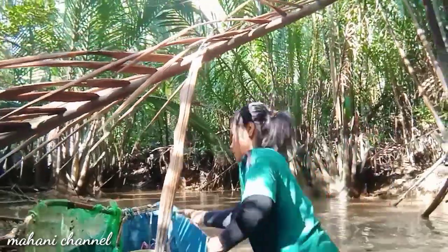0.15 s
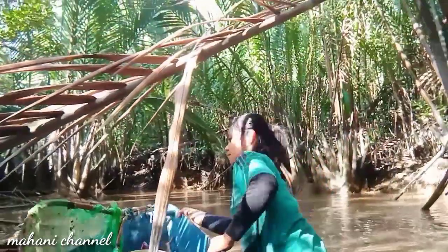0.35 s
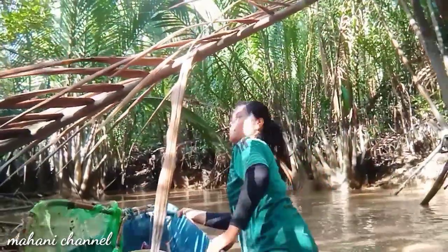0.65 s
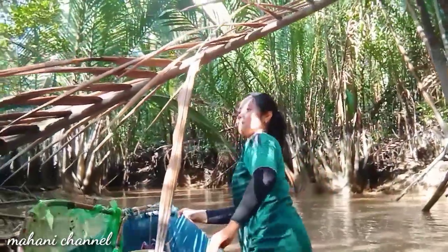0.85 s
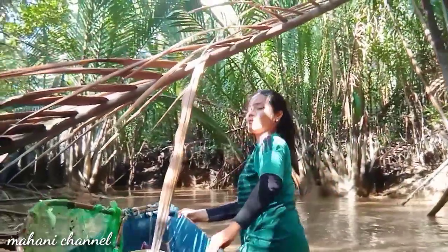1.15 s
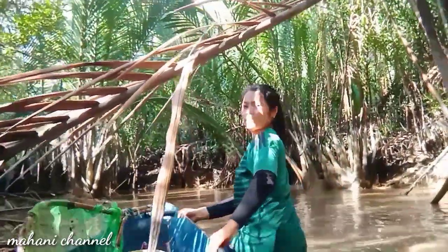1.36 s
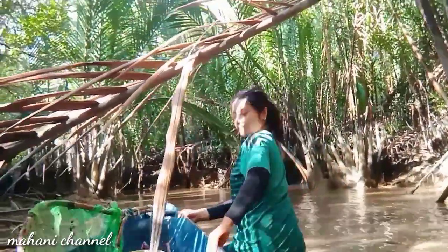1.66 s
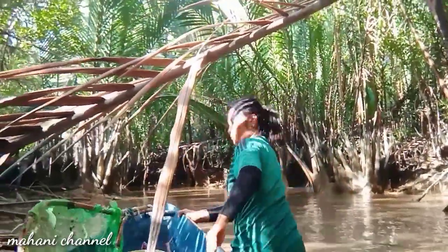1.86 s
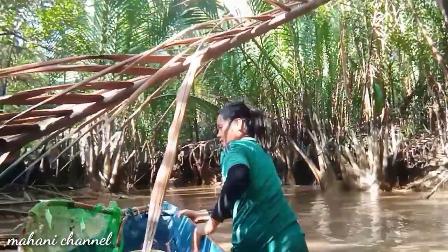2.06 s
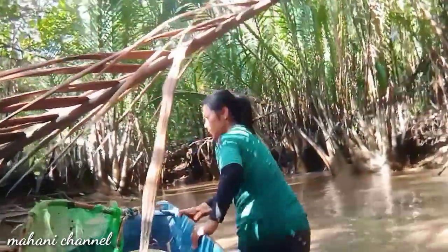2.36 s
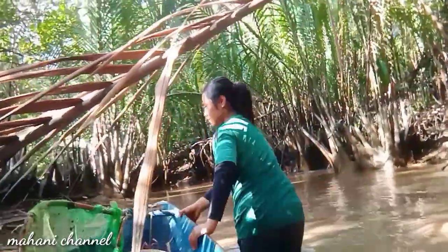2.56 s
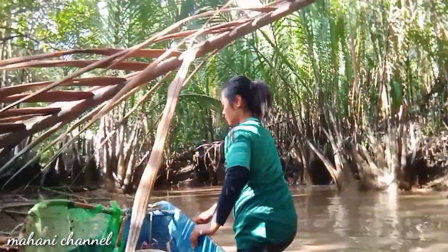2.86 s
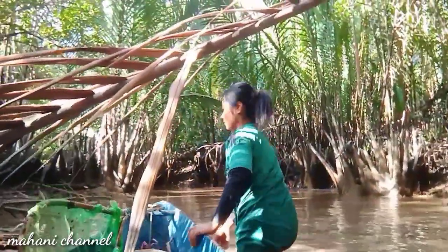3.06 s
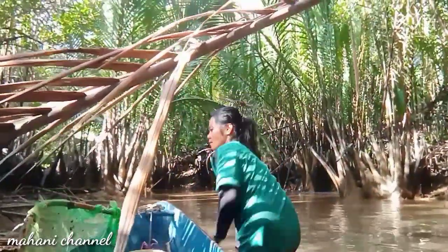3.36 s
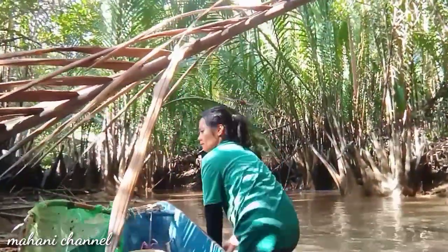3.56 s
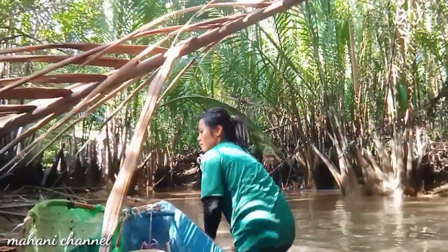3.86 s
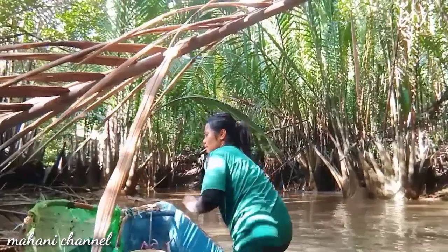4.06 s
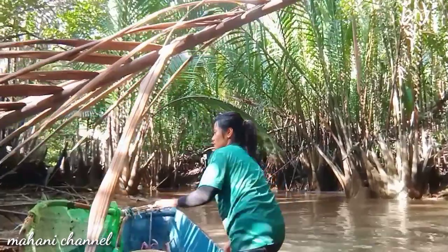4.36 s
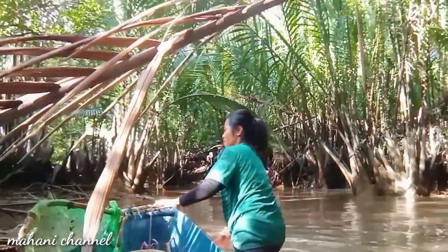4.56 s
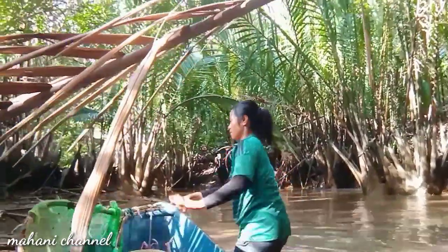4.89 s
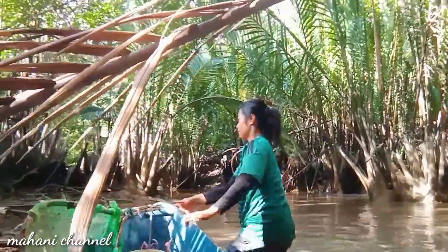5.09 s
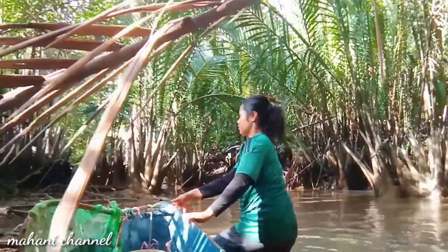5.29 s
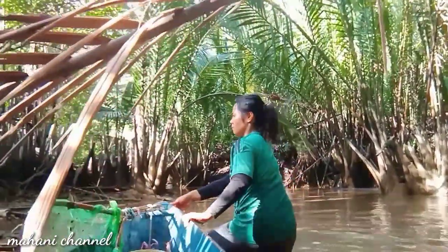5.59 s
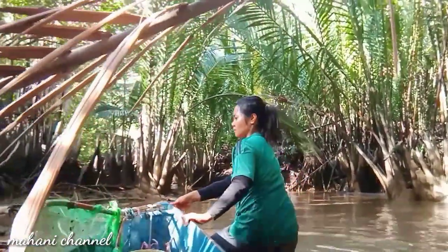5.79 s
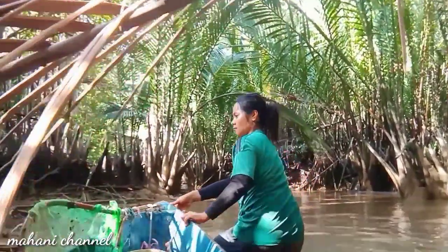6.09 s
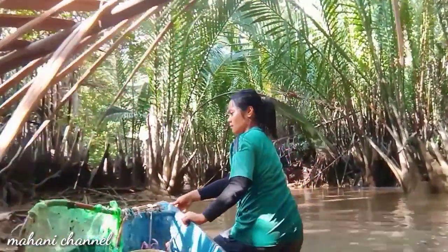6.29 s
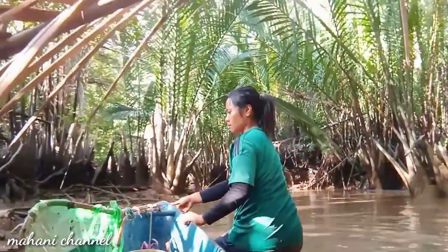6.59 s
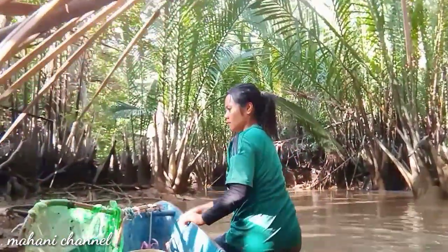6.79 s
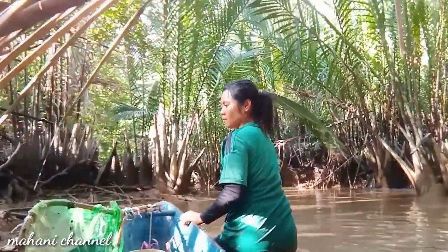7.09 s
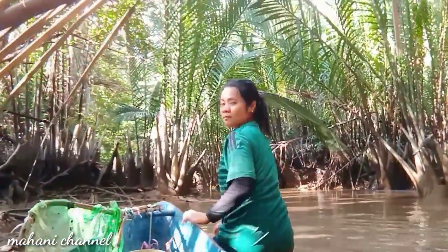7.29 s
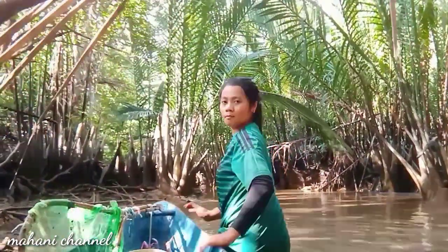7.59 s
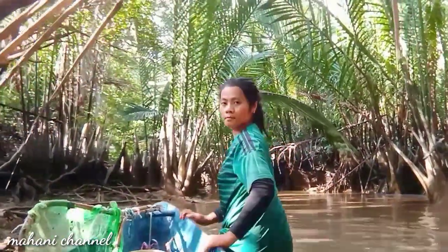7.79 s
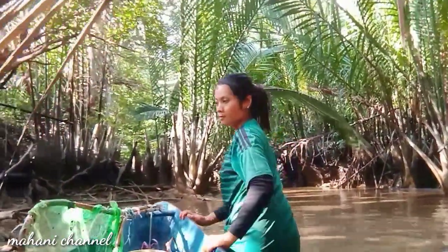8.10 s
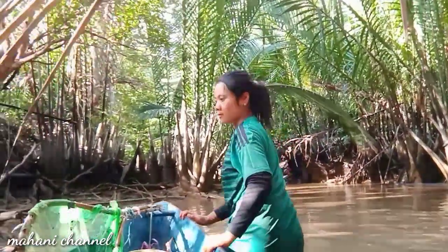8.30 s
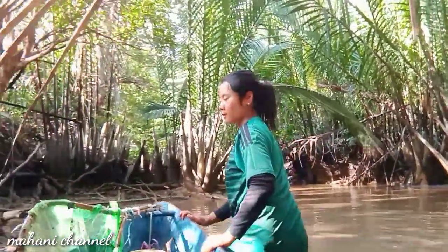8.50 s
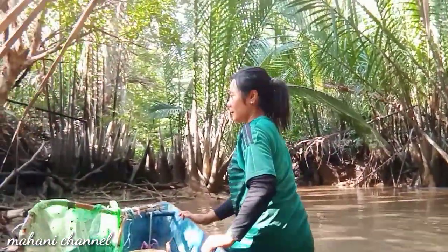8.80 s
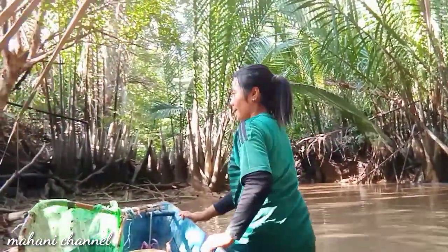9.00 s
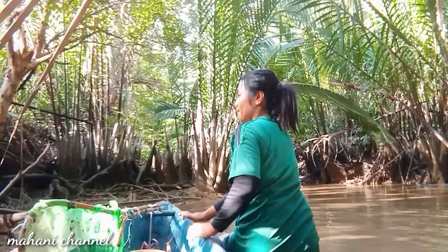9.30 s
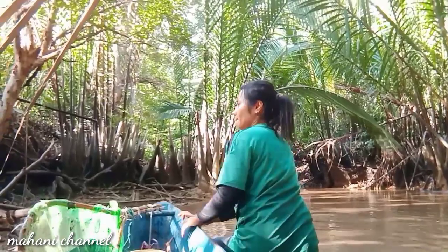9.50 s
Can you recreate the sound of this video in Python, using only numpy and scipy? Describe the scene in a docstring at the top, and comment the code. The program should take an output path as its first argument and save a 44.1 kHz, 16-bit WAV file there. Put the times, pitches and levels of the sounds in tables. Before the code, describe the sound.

Bright pulsing insect chorus dominates throughout; beneath it, muddy water sloshes and drips, dry fronds brush, and a tub thuds softly, with one stronger splash near the end.

```python
"""From the start a cicada chirps about seven times a second in a palm swamp, and neighbours answer it.
Still air and a far, wavering motor lie under it all. Drips ring early on, and someone begins to wade
in the creek: water sloshes, dry fronds brush and air gulps. After two seconds stalks snap and a plastic
tub is bumped. Thin bird whistles come in past the middle; the strongest splash follows near eight seconds.
Noise, ringing bubbles, decaying tones and rows of clicks make these sounds."""
import sys
import numpy as np
from scipy import signal
from scipy.fft import rfft, irfft, next_fast_len
from scipy.io import wavfile

SR = 44100
rng = np.random.default_rng(int(sys.argv[2]) if len(sys.argv) > 2 else 0)


def dump_mix(stems):
    """Bounce the given channels to the path in sys.argv[1] as a 16-bit WAV at rate SR."""
    frames = np.atleast_2d(stems).T  # one column per channel
    limited = np.clip(frames, -1, 1)  # hard clip at full scale
    pcm = np.round(limited * 32767).astype(np.int16)
    wavfile.write(sys.argv[1], SR, pcm)


N = 425565
T = np.arange(N) / SR  # time of every sample, s


def undb(db):
    """Turn decibels into a gain."""
    return 10 ** (np.asarray(db) / 20)


def unit(x):
    """Scale a sound to an rms of 1."""
    return x / np.sqrt(np.mean(x ** 2))


def curve(rows):
    """Draw a gain over time through (start_s, level_db) rows."""
    return undb(np.interp(T, *np.transpose(rows)))


def wander(seconds):
    """Smooth noise over the given time into a slow random drift of rms 1."""
    window = np.hanning(int(seconds * SR))
    return unit(signal.fftconvolve(rng.standard_normal(N), window, "same"))


def add(out, start_s, x):
    """Mix x into out from the given time."""
    i = int(start_s * SR)
    if 0 <= i < N:
        out[i:i + len(x)] += x[:N - i]


def ring(x, response):
    """Let every moment of x set off the same response."""
    return signal.fftconvolve(x, response)[:N]


def colour(x, points):
    """Make some pitches louder or softer, following (pitch_hz, level_db) points."""
    hz, db = np.transpose(points)
    size = next_fast_len(N, True)
    f = np.maximum(np.fft.rfftfreq(size, 1 / SR), 1)
    gain = undb(np.interp(np.log(f), np.log(hz), db))
    return irfft(rfft(x, size) * gain, size)[:N]


def thicket(t60, gap, count=400):
    """Scatter fading echoes, as off many stems, after a gap; their total energy is 1."""
    t = rng.uniform(0, t60, count)
    places = np.clip((t + gap) * SR, 0, SR - 1).astype(int)
    response = np.zeros(SR)
    np.add.at(response, places, rng.standard_normal(count) * 1000 ** (-t / t60))
    return response / np.linalg.norm(response)


def swaying(x, t60, gap, count=3):
    """Echo off moving fronds: the sound drifts between several sets of paths."""
    weights = np.array([wander(0.64) for _ in range(count)])
    weights /= np.linalg.norm(weights, axis=0)
    return sum(w * ring(x, thicket(t60, gap)) for w in weights)


def bubble(hz, cycles, glide):
    """A pocket of air rings, wobbles and glides (octaves per s), fading by 60 dB in some cycles."""
    t60 = cycles / hz
    t = np.arange(int(t60 * SR)) / SR
    knots = np.linspace(0, t60, 24)
    wobble, swell = (np.interp(t, knots, row) for row in rng.standard_normal((2, len(knots))))
    pitch = hz * 2 ** (glide * t + .08 * wobble)
    tone = np.sin(2 * np.pi * np.cumsum(pitch) / SR)
    onset = 1 - np.exp(-t * hz)
    return tone * undb(2.0 * swell) * 1000 ** (-t / t60) * onset


# Colour of the still swamp air: pitch_hz [Hz], relative level_db [dB]
AIR_COLOUR = [(15, -11), (40, -11), (80, -1.5), (130, -5), (250, -9), (500, -17.5), (1000, -17),
              (1230, -18.5), (1550, -21), (3000, -20.5), (8000, -16)]


def air():
    """The faint, steady rush of still air is coloured noise."""
    return undb(-64.0) * unit(colour(rng.standard_normal(N), AIR_COLOUR))


# Loudness of the far motor before it wavers: start_s [s], level_db [dB]
MOTOR_LEVEL = [(0, -70), (.9, -64.5), (1.6, -71), (2.3, -83), (2.9, -67), (3.4, -85), (9.65, -77)]
MOTOR_HZ = 92.5


def motor():
    """A far motor hums on one low pitch while its strength wavers."""
    hum = np.sqrt(2) * np.sin(2 * np.pi * MOTOR_HZ * T)
    return curve(MOTOR_LEVEL) * (1 + 0.85 * wander(0.08)) * hum


# Bird whistles: start_s [s], peak level_db [dB], length_s [s], start_hz [Hz], end_hz [Hz] (roughly)
WHISTLES = [(5.9, -60, 0.15, 4030, 3920), (7.365, -65, 0.31, 3960, 4020), (9.133, -59, 0.27, 4060, 4180)]


def bird():
    """Thin, slowly gliding tones whistle from deep in the palms."""
    out = np.zeros(N)
    for s, db, length, start_hz, end_hz in WHISTLES:
        n = int(length * SR)
        hz = start_hz + (end_hz - start_hz) * np.sin(np.linspace(0, 2, n))
        add(out, s, undb(db) * np.hanning(n) * np.sin(2 * np.pi * np.cumsum(hz) / SR))
    return out


# Strokes of legs and hands in the water: crest_s [s], relative level_db [dB], settling_s [s]
STROKES = [(0.919, -59, 0.038), (1.05, -63, 0.054), (1.29, -66, .35), (2.0, -66.5, 0.062),
           (2.7, -60.5, 0.092), (3.199, -63.5, 0.3), (3.441, -63, 0.081), (3.67, -57.5, 0.092),
           (3.78, -56, 0.049), (4.48, -66, .06), (5.29, -72.5, .15), (6.8, -64, 0.27), (7.71, -69, 0.056),
           (8.2, -51.5, .17), (8.42, -55, 0.14), (8.64, -61, .1), (9.38, -64, 0.48)]
SWELL_SHARE, CALM_DB = .35, -76  # swelling time as a share of settling time; lapping between strokes


def stirring():
    """The water is stirred in strokes that swell quickly and settle slowly."""
    power = undb(CALM_DB) ** 2
    for s, db, settle in STROKES:
        fade = np.maximum(T - s, (s - T) / SWELL_SHARE) / settle
        power = power + (undb(db) * np.exp(-np.minimum(fade, 20))) ** 2
    return np.sqrt(power)


# Colour of bubbles and spray: pitch_hz [Hz], relative level_db [dB]
SPRAY_COLOUR = [(100, 0), (300, -9.5), (700, -5), (950, -8.5), (1230, 10), (1550, 3), (2400, 0), (4000, 4),
                (9000, -33)]
SPRAY_FLICKER_DB = 2


def water(count=9000):
    """The harder the water is stirred, the more ringing bubbles and noisy spray it sheds."""
    fizz, stir = np.zeros(N), stirring()
    for when, pitch, loud, chance in rng.random((count, 4)):
        hz = 380 * 8 ** pitch
        if chance < .03 + stir[int(when * N)] / undb(-50):
            add(fizz, when * N / SR, undb(16 * loud) * bubble(hz, cycles=82, glide=1.6))
    spray = rng.standard_normal(N)
    stirred = colour(undb(-5.5) * fizz + undb(4) * spray, SPRAY_COLOUR)
    flicker = undb(SPRAY_FLICKER_DB * wander(0.055))
    return undb(-2.5) * stirred * flicker * stir


# Drips falling back into the creek: start_s [s], approximate peak level_db [dB], starting pitch_hz [Hz]
DRIPS = [(.2, -58.5, 1720), (.54, -56.5, 1001), (.769, -46, 1207), (1.22, -54, 760), (1.477, -46, 1270),
         (2.926, -41.5, 1307), (3.15, -51, 658), (3.532, -51, 1900), (3.6, -53, 603), (3.632, -40, 1780),
         (3.746, -40, 1310), (5.431, -49.5, 3130), (5.74, -36.5, 1282), (6.487, -52, 1443),
         (6.674, -49.5, 1546), (7.296, -46.5, 1313), (8.169, -28.5, 1197), (8.182, -41, 679),
         (8.193, -35, 1163), (8.4, -42, 1324), (8.63, -36, 1584), (9.402, -50, 1265), (9.477, -50, 698),
         (9.492, -47.5, 1290)]
DRIP_CYCLES, DRIP_GLIDE = 108, 1.53  # ring length in cycles; octaves per s


def drips():
    """Each small drip rings a bubble that rises in pitch."""
    out = np.zeros(N)
    for s, db, hz in DRIPS:
        add(out, s, undb(db) * bubble(hz, DRIP_CYCLES, DRIP_GLIDE))
    return out


# Gulps of large air pockets: start_s [s], approximate peak level_db [dB], starting pitch_hz [Hz]
GULPS = [(1.699, -55.5, 444), (1.785, -50.5, 461), (2.122, -58, 280), (2.703, -51, 324), (7.654, -49, 331),
         (7.7, -44, 282.5), (9.35, -41.5, 303), (9.616, -50, 298)]
GULP_CYCLES, GULP_GLIDE = 62, -6  # ring length in cycles; octaves per s


def gulps():
    """Each large pocket of air rings low and sinks in pitch."""
    out = np.zeros(N)
    for s, db, hz in GULPS:
        add(out, s, undb(db) * bubble(hz, GULP_CYCLES, GULP_GLIDE))
    return out


# Dry fronds brushing: start_s [s], level_db [dB], length_s [s]
RUSTLES = [(0.88, -63, 0.11), (1.01, -63.5, 0.079), (1.16, -68, 0.07), (3.213, -62, 0.084),
           (3.299, -62.5, 0.2), (3.616, -55, 0.068), (3.74, -53, 0.06), (4.158, -70, .08),
           (5.219, -66, 0.096), (5.792, -54.5, .05), (6.762, -55, 0.029), (7.714, -64, 0.019),
           (8.379, -56, 0.06), (8.859, -63.5, 0.021)]
RUSTLE_HZ, TICKS_PER_S = 2567, 1400  # middle pitch of the ticks; how densely they come


def fronds():
    """Dry leaflets slide in a swell of tiny ticks, each ringing briefly at its own pitch."""
    out = np.zeros(N)
    for s, db, length in RUSTLES:
        rustle = np.zeros(SR // 2)
        for place, pitch, loud in rng.random((int(length * TICKS_PER_S) + 3, 3)):
            tick = bubble(RUSTLE_HZ * 2 ** (1.5 * (pitch - .5)), cycles=34.4, glide=0)
            swell = np.sin(np.pi * place) ** .5
            add(rustle, place * min(length, .4), undb(11 * loud) * swell * tick)
        add(out, s, undb(db) * rustle * np.sqrt(length * SR) / np.linalg.norm(rustle))
    return out


# Bumps of the tub: start_s [s] (sounded 3 ms early), peak level_db [dB], brightness [dB per octave]
BUMPS = [(2.71, -52.5, 1), (3.814, -47, 7.5), (4.284, -42, 6), (4.296, -29.5, -9.5), (4.869, -43.5, -9),
         (5.052, -30, -5), (5.085, -35.5, -10.5), (5.331, -44.5, -1), (5.793, -30, 13.5),
         (6.212, -38, 14.5), (6.714, -41, 17), (7.665, -43, -7), (8.08, -50, 1), (8.185, -33.5, 15.5),
         (9.627, -43, -12)]
# Tones the tub rings at: pitch_hz [Hz], relative level_db before brightness [dB], time to fade 60 dB [s]
TUB_MODES = [(138, -14.5, 0.21), (156, -8, 0.06), (212.3, -4, 0.13), (232, -0.5, 0.16), (290.7, 0.5, 0.097),
             (342.5, -6, 0.13), (439, -11.5, 0.1), (547, -9, 0.083), (742, -14.5, 0.11),
             (842, -19.5, 0.063)]


def tub():
    """Soft, rubbing blows ring the floating plastic tub and thud in the water."""
    out, t = np.zeros(N), T[:SR // 3]
    for s, db, tilt_db in BUMPS:
        knock = np.zeros(len(t))
        for hz, mode_db, t60 in TUB_MODES:
            bent_hz = hz * (1 + 0.022 * rng.standard_normal())
            tone = np.sin(2 * np.pi * (bent_hz * t + rng.random()))
            knock += undb(mode_db + tilt_db * np.log2(hz)) * 1000 ** (-t / t60) * tone
        thud = signal.lfilter(*signal.butter(1, [130, 380], "band", fs=SR), rng.standard_normal(len(t)))
        thud = signal.lfilter(*signal.butter(3, 1100, fs=SR), thud)
        thud = unit(thud) * np.exp(-t / 0.015)
        soft_onset = 1 - np.exp(-(t / 0.005) ** 2)
        knock = (knock / abs(knock).max() + 0.08 * thud) * soft_onset
        add(out, s - .003, undb(db) * knock / abs(knock).max())
    return out


# Snapping stalks: start_s [s], relative level_db [dB], pitch_hz [Hz], time to fade 60 dB [s],
# relative splinter_db [dB]
SNAPS = [(2.262, -18, 1162, 0.044, -14), (2.745, -21, 1250, 0.036, -15), (3.394, -36.5, 3650, 0.051, -11.5),
         (5.792, -30, 744, 0.12, -17), (5.794, -37, 1630, 0.068, -19), (6.199, -25.5, 1182, 0.069, -4.5),
         (6.713, -26.5, 1186, 0.083, -4), (7.035, -31, 1434, 0.083, -19)]
# Colour of all snaps: pitch_hz [Hz], relative level_db [dB]
SNAP_COLOUR = [(100, -17), (600, -4), (1000, -6.0), (1700, -3.5),
               (2250, 7.0), (2900, 4.0), (8000, 3.5), (15000, -20.0)]


def stalks():
    """Fibres break in a short noisy crackle that rings the stalk as a band of noise."""
    out, t = np.zeros(N), T[:SR // 4]
    for s, db, hz, t60, splinter_db in SNAPS:
        crack = rng.standard_normal(len(t)) * (np.exp(-t / .002) + .22 * np.exp(-t / .01))
        band = signal.butter(2, [hz * 0.81, hz * 1.112], "band", fs=SR)
        wood = unit(signal.lfilter(*band, rng.standard_normal(len(t))))
        wood *= 1000 ** (-t / t60) * (1 - np.exp(-t * hz))
        add(out, s, undb(db) * (undb(-4.5) * wood + undb(splinter_db + 5.5) * crack))
    return colour(out, SNAP_COLOUR)


# Resonances of the tymbals and hollow abdomen: pitch_hz [Hz], width scale [Hz], relative level_db [dB]
BODY = [(5010, 845, -19), (5624, 512, -9), (5993, 372, -1.5), (6165, 307, -1.5), (6690, 41, -6),
        (7090, 255, -7.5), (7380, 632, -8.5), (7820, 170, -17.5), (8265, 440, -21.5), (9100, 850, -33.5),
        (11320, 1040, -28), (12200, 830, -27.5), (14730, 400, -26.5), (16200, 1300, -57)]


def abdomen(size=2048):
    """A rib click rings the body from its start onward; the small body radiates no low notes."""
    f = np.fft.rfftfreq(size, 1 / SR)
    power = sum(undb(db) ** 2 / (1 + ((f - hz) / width * 1.214) ** 2) ** 3 for hz, width, db in BODY)
    edge_hz = 4620
    power = power / (1 + (edge_hz / np.maximum(f, edge_hz / 2)) ** 50) + 1e-12
    # keeping only half the cepstrum leaves no ringing before the click
    cepstrum = irfft(np.log(power))[:size // 2]
    cepstrum[0] /= 2
    response = irfft(np.exp(rfft(cepstrum, size)))
    return response / np.linalg.norm(response)


# Runs of chirps, each with its own steady beat: start_s [s], beat_s from chirp to chirp [s]
RUNS = [(-.017, .133), (.249, .1366), (2.161, .136), (3.806, .1363), (5.986, .1338), (6.914, .1358),
        (8.538, .1342)]


def beats():
    """Each run of chirps keeps its beat until the next run begins."""
    ends = [start for start, _ in RUNS[1:]] + [N / SR + RUNS[-1][1] / 2]
    runs = [np.arange(start, end - beat / 2, beat) for (start, beat), end in zip(RUNS, ends)]
    return np.concatenate(runs)


RIB_COUNT, RIB_DB, LAST_RIB_DB = 15, -0.42, -6.5  # even clicks; the last rib only half buckles


def tymbal(starts, click_hz, chirp_scatter_db, rib_scatter_db, jitter_ms, after):
    """Each chirp buckles a row of ribs at its own pace; every rib snaps, then again more softly."""
    out = np.zeros(N)
    for s in starts:
        pace_hz = click_hz * (1 + .005 * rng.standard_normal())
        chirp_db = RIB_DB + chirp_scatter_db * rng.standard_normal()
        for k, (late, loud, lag) in enumerate(rng.standard_normal((RIB_COUNT, 3))):
            when = s + k / pace_hz + late * jitter_ms / 1000
            last_db = LAST_RIB_DB * (k == RIB_COUNT - 1)
            click = undb([chirp_db + rib_scatter_db * loud + last_db])  # one sample long
            add(out, when, click)
            add(out, when + .0006 + .00012 * lag, after * click)
    return out


CLICK_HZ = 225.7  # rib clicks per second within a chirp
# Neighbours that answer each chirp: lag_s [s], relative level_db [dB]
NEIGHBOURS = [(.003, -2.5), (.009, 3.5), (0.039, -16.5), (0.063, -3.5), (0.068, 1), (.075, 2)]
# Loudness of the chorus: start_s [s], relative level_db [dB]
CHORUS_LEVEL = [(0, -26.5), (1.3, -25), (2.2, -26.5), (4.1, -24), (4.5, -26.5), (5.6, -24.5), (7.4, -25.5),
                (9.65, -27.5)]
CHORUS_SCATTER_DB = 1.5  # from chirp to chirp
HUSH_DB, HUSH_LEAD_S, HUSH_S = -3, .021, 0.027  # depth, start before the chirp, length


def cicada_chorus(starts):
    """Neighbours answer late, each at its own click rate, over a noise hiss of the farthest singers."""
    others = np.zeros(N)
    for lag, db in NEIGHBOURS:
        answers = starts + lag + .003 * rng.standard_normal(len(starts))
        click_hz = CLICK_HZ * rng.uniform(.92, 1.08)
        others += undb(db) * tymbal(answers, click_hz, CHORUS_SCATTER_DB,
                                    rib_scatter_db=0.8, jitter_ms=.1, after=0.46)
    others = unit(others + undb(4.0) * swaying(others, t60=.04, gap=.001))
    chorus = undb(-3.2) * (others + .75 * rng.standard_normal(N))
    # all of them fall back together, most deeply just before each chirp
    hush = np.zeros(N)
    for s in starts:
        add(hush, s - HUSH_LEAD_S, np.hanning(int(HUSH_S * SR)))
    chorus *= curve(CHORUS_LEVEL) * undb(HUSH_DB * hush)
    # leaves dull the distant voices
    return colour(chorus, [(4500, 1), (6000, 0), (7300, -1), (12000, 0), (15000, -3)])


# Loudness of the nearest cicada: start_s [s], relative level_db [dB]
SINGER_LEVEL = [(0, -24), (2.5, -24.5), (3.5, -24), (3.95, -22.5), (4.9, -23.5), (5.3, -24.5), (7, -25.5),
                (7.6, -24.5), (9.65, -24)]
SINGER_SCATTER_DB = .5  # from chirp to chirp


def near_cicada(starts):
    """The nearest singer clicks its ribs, and the clicks echo among the stems and fronds."""
    near = tymbal(starts, CLICK_HZ, SINGER_SCATTER_DB, rib_scatter_db=1.2, jitter_ms=.04, after=0.38)
    near *= curve(SINGER_LEVEL)
    close_echoes = undb(-5) * swaying(near, t60=.05, gap=.0015)
    far_echoes = undb(-15) * swaying(near, t60=.22, gap=.015)
    return undb(21.3) * (near + close_echoes + far_echoes)


def cicadas():
    """The clicks of the near singer and its chorus all ring through the same kind of body."""
    starts = beats()
    return ring(cicada_chorus(starts) + near_cicada(starts), abdomen())


def scene():
    """The work in the creek echoes lightly off the bank, under the cicadas."""
    work = water() + drips() + gulps() + fronds() + tub() + stalks()
    bank = undb(-17.5) * ring(work, thicket(t60=0.26, gap=0.0073, count=1500))
    return (air() + motor() + bird() + work + bank + cicadas())[None]


def record(dry):
    """A steep low-pass filter cuts the treble above 15500 Hz."""
    return signal.sosfilt(signal.ellip(12, .2, 80, 15500, fs=SR, output="sos"), dry)


dry = scene()
out = record(dry)
dump_mix(out)
```